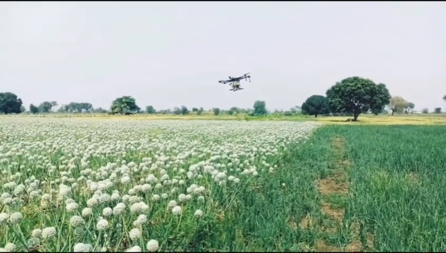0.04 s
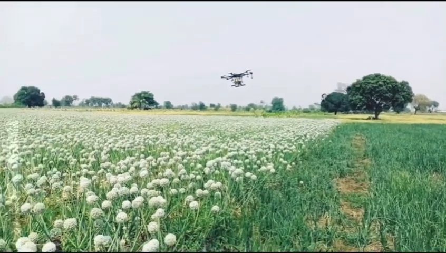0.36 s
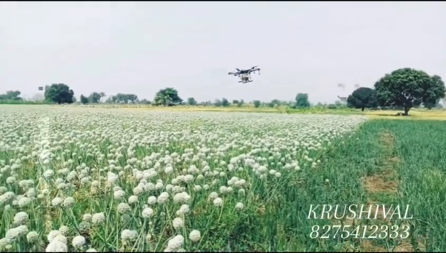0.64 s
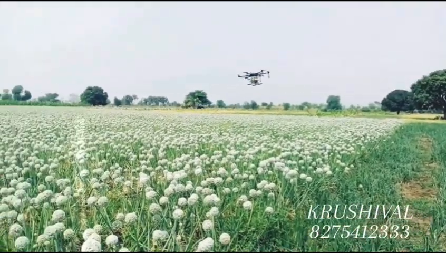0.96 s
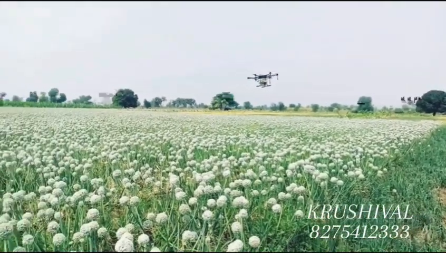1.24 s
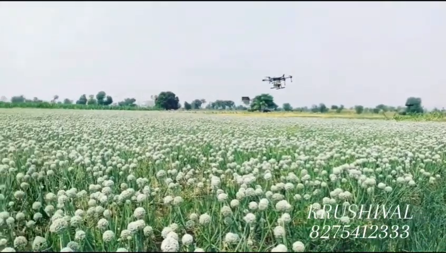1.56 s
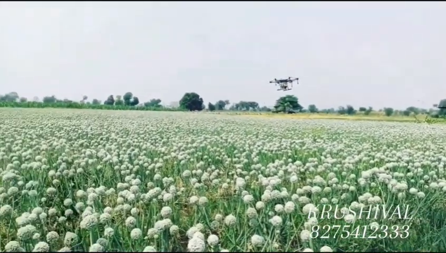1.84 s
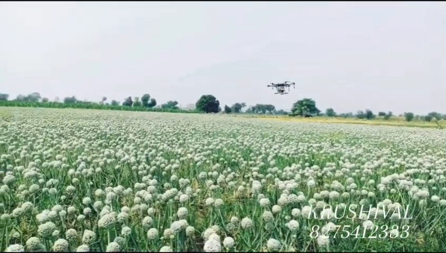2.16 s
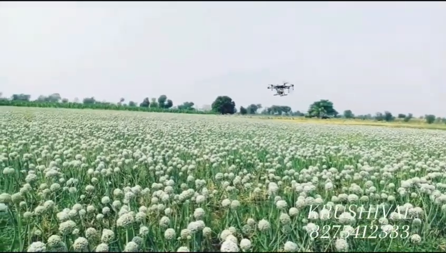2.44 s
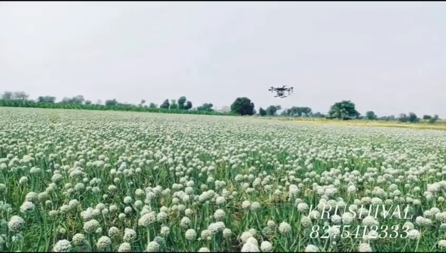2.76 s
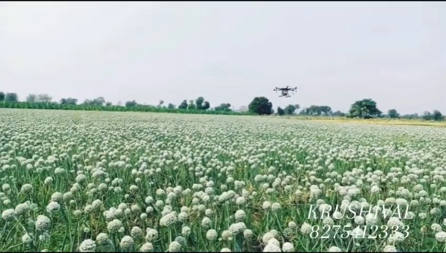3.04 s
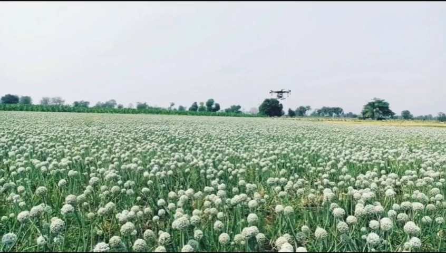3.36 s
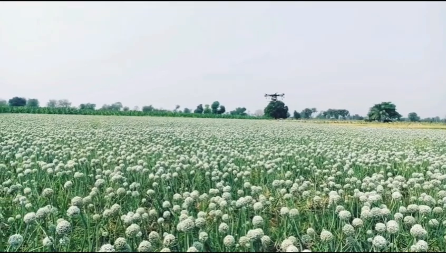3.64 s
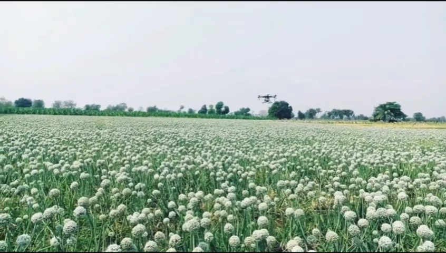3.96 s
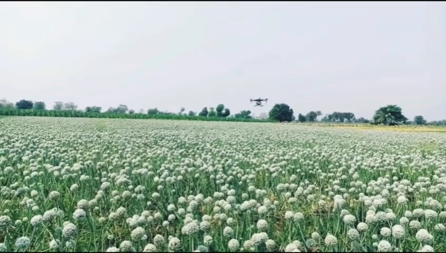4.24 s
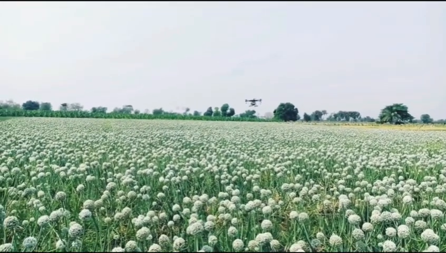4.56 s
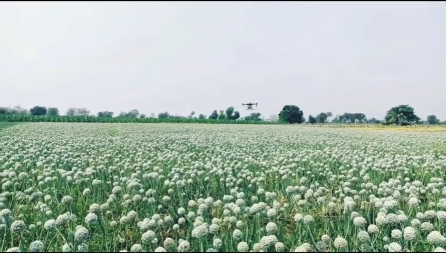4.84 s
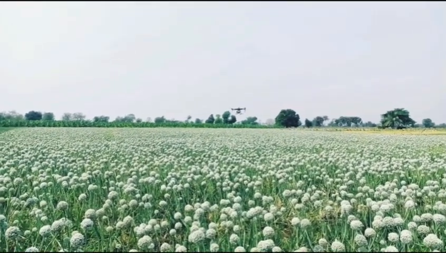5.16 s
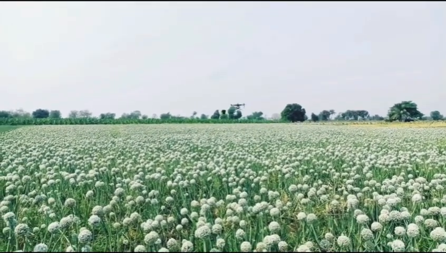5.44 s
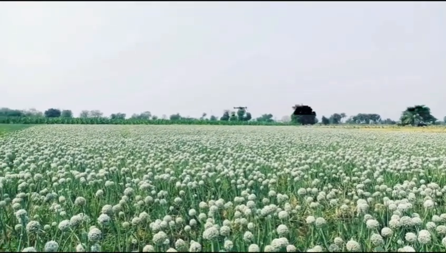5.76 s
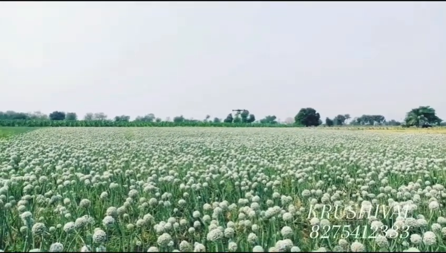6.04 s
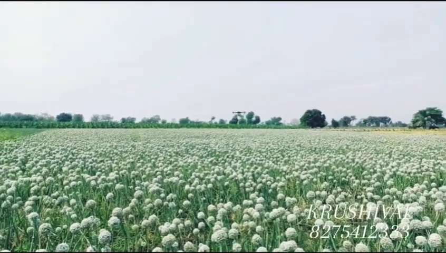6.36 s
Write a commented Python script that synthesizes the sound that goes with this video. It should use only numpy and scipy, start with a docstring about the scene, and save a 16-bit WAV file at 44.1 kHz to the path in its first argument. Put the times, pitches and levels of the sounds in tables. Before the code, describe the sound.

From the first moment a six-rotor drone is heard flying low over an open field, about thirty metres from a stereo microphone. Its rotors run at slightly different speeds, so their low hums beat and waver, topped by a buzz and the rasping chop of blades cutting air. The level holds for about two and a half seconds, with small swells. Around 2.5 seconds a thin, high motor whine comes through and then flickers faintly, while the reflection off the ground makes the rush sound hollow. From about 3 seconds the drone moves away: the upper buzz fades, the pitch sags very slightly and everything grows steadily fainter, though it remains audible to the end at 6.5 seconds. A light breeze rumbles softly on the microphone throughout, with a small puff at half a second and several more between about 5.3 and 6.2 seconds.

```python
"""An open field, a two-port stereo microphone in a light breeze, a six-rotor crop drone low at 30 m.
From the start its hums beat, each rotor at a slightly different speed, and the blades chop and rasp.
Over three seconds it swings onto its course; a thin motor whine comes through, and the echo off the
ground hollows the sound. It then recedes to 65 m, ever fainter, and near the end puffs of air
brush the microphone."""
import sys
import numpy as np
from scipy import signal
from scipy.fft import rfft, irfft, next_fast_len
from scipy.io import wavfile
from scipy.ndimage import uniform_filter1d

SR = 44100
rng = np.random.default_rng(int(sys.argv[2]) if len(sys.argv) > 2 else 0)


def unload_wav(signal):
    """Save mono or channel-first audio to the path in sys.argv[1] as 16-bit WAV at rate SR, clipped to [-1, 1]."""
    wavfile.write(
        sys.argv[1],
        SR,
        np.round(np.clip(np.atleast_2d(signal).T, -1, 1) * 32767).astype(np.int16),
    )


N = 286650
TIME = np.arange(N) / SR

# rotor balance, fastest first: (fundamental [dB], second harmonic [dB], higher harmonics [dB])
ROTOR_BALANCE = [(-0.5, 0.5, -4.5), (-4, -3, -2.5), (-7.5, -3.5, 1.5), (8.5, -9, -5), (6.5, -7.5, -9.5),
                 (1.5, -13, -17)]


def from_db(db):
    return 10 ** (np.asarray(db) / 20)


def rms_one(x):
    return x / np.sqrt(np.mean(x ** 2) + 1e-20)


def in_time(rows, t=TIME):
    """Each column of a curve, joined by straight lines."""
    times, *columns = np.transpose(rows)
    return [np.interp(t, times, c) for c in columns]


def at_hz(rows, hz):
    """Each column of a spectrum, joined on a log-frequency axis."""
    points, *columns = np.transpose(rows)
    return np.array([np.interp(np.log(np.maximum(hz, 1)), np.log(points), c) for c in columns])


def below(hz, edge_hz):
    """Low-pass gain, one half at the edge."""
    return 1 / (1 + (hz / edge_hz) ** 4)


def colour(x, gain_at):
    """Filter by a gain given as a function of frequency."""
    size = next_fast_len(N + SR // 10)
    hz = np.arange(size // 2 + 1) * SR / size
    return irfft(rfft(x, size) * gain_at(hz), size)[..., :N]


def drift(rate_hz):
    """Slow random wander, spread 1."""
    step, settle = 100, 1000
    pole = np.exp(-2 * np.pi * rate_hz * step / SR)
    noise = rng.standard_normal(N // step + settle + 2)
    slow = signal.lfilter([1], [1, -2 * pole, pole * pole], noise)[settle:]
    return np.interp(np.arange(N) / step, np.arange(len(slow)), rms_one(slow))


def patches(shape, frames):
    """A smooth random field over frequency and time, spread 1."""
    field = rng.standard_normal(shape)
    for _ in range(2):
        field = uniform_filter1d(uniform_filter1d(field, size=3, axis=0), size=frames, axis=1)
    return rms_one(field)


def doublings(t=TIME):
    """How many times the distance to the microphone has doubled since the start."""
    # the drone lingers, then gathers speed: (time [s], distance [m])
    flight_path = [(0, 31.3), (1.5, 28.4), (2.5, 28.9), (4, 38.2), (6.5, 65)]
    metres, = in_time(flight_path, t)
    return np.log2(metres / metres[0])


def blade_angles():
    """Steering speeds some rotors up and slows others; each angle runs one cycle per blade pass."""
    # blade-pass rate: (time [s], middle rotor [Hz], fastest above it [Hz], slowest below it [Hz])
    pass_rates = [(0, 116.5, 5.3, 13.87), (.2, 116.4, 4.68, 7.61), (.55, 115.4, 7.49, 6.04),
                  (.9, 113.9, 9.37, 8.53), (1.25, 113.5, 14.14, 11.81), (1.6, 113.3, 8.07, 12.29),
                  (2, 113.3, 9.22, 9.15), (2.4, 114.5, 5.47, 13.29), (2.8, 113.4, 9.45, 10.53),
                  (3.2, 113.2, 8.13, 11.53), (3.6, 113.6, 7.37, 12.14), (4, 113, 8.38, 14.99),
                  (4.4, 112.9, 9.83, 12.88), (4.8, 112.5, 10.23, 11.6), (5.2, 111.3, 6.6, 10.43),
                  (5.6, 109.8, 10.33, 12.02), (6.05, 110.5, 11.98, 13.94), (6.5, 110.2, 9.97, 14.01)]
    # each rotor's part in the steering: (part [1 fastest to -1 slowest])
    steering = [1, .524, .12, 0, -.5345, -1]
    middle, faster, slower = in_time(pass_rates)
    rates = [middle + part * (faster if part > 0 else slower) for part in steering]
    return 2 * np.pi * np.cumsum(rates, axis=1) / SR


def rotor_hum(angles, flutter_db, flutter_hz, wander_rad):
    """Steady load on the blades gives a clean tone; uneven inflow makes its overtones flutter."""
    # blade tones before distance loss: (time [s], fundamental [dB], second [dB], third harmonic [dB])
    blade_tones = [(0, -49, -42.5, -39), (.18, -42.5, -46, -43), (.45, -47.5, -44, -40.5),
                   (.6, -55, -48, -44), (.77, -45, -46.5, -43.5), (1.25, -47.5, -49, -40.5),
                   (1.75, -47.5, -52, -42), (2.25, -46.5, -55, -49), (2.42, -46.5, -47, -50.5),
                   (2.6, -45.5, -56, -43), (2.8, -47.5, -56, -51.5), (3, -47.5, -54, -47.5),
                   (3.6, -48.5, -56, -50), (4.12, -47.5, -55.5, -50.5), (5, -50, -60.5, -51),
                   (6.5, -47.5, -64, -54)]
    # upper buzz: (multiple of the blade-pass rate, starting level [dB])
    buzz = [(4, -55), (5, -48), (6, -49.5), (7, -49.5), (8, -52)]
    first, second, third = from_db(in_time(blade_tones))
    shares = from_db(ROTOR_BALANCE) / np.linalg.norm(from_db(ROTOR_BALANCE), axis=0)
    beam = from_db(-3.5 * TIME)   # overtones beam downward, so they fade as the drone leaves
    out = 0
    for angle, share in zip(angles, shares):
        shaft = from_db(-26.5) * np.sin(angle / 2)   # unbalanced blades, once a turn
        out += first * share[0] * (np.sin(angle) + shaft)
        overtones = [(2, second * share[1]), (3, third * share[2])]
        overtones += [(round(multiple), share[2] * beam * from_db(db)) for multiple, db in buzz]
        for multiple, level in overtones:
            phase = multiple * angle + rng.uniform(0, 2 * np.pi) + wander_rad * drift(flutter_hz)
            out += level * from_db(flutter_db * drift(flutter_hz)) * np.sin(phase)
    return np.sqrt(2) * out


def blade_slaps(angles, jitter_rad, wander_rad, rough, unequal, scatter_rad, scatter_hz):
    """Every blade passing its arm sheds a pulse, never quite on time or equally strong."""
    out = np.zeros(N)
    grid_hz = scatter_hz * np.arange(256)
    for angle, (*_, db) in zip(angles, ROTOR_BALANCE):
        unsteady = angle + jitter_rad * drift(8.7) + wander_rad * drift(1.2)
        passes = np.floor(unsteady / (2 * np.pi) + rng.random())
        hits = np.flatnonzero(np.diff(passes) > 0)
        strength = 1 + rough * rng.standard_normal(N // 100)[:len(hits)]
        pulses = np.zeros(N)
        pulses[hits] = from_db(db / 2) * strength * (1 + unequal * (-1) ** np.arange(len(hits)))
        # the frame scatters each rotor's pulses differently
        twist = scatter_rad * np.cumsum(rng.standard_normal(len(grid_hz)))
        out += colour(pulses - pulses.mean(), lambda hz: np.exp(1j * np.interp(hz, grid_hz, twist)))
    return rms_one(out)


def tip_noise(angles, depth):
    """Tip turbulence swells as each blade swings towards the microphone; its treble is wide."""
    # likeness of the swish at the two ports: (frequency [Hz], likeness [0-1])
    likeness = [(300, 0.8), (520, 0.6), (700, 0.95), (1050, 0.16), (1400, 0.58), (2400, 0.53), (3000, 0.34),
                (5000, 0.05), (9000, 0)]
    swell = np.sqrt(sum(np.exp(depth * np.cos(angle) + 0.21 * drift(10.0)) for angle in angles))
    mid, side = rms_one(swell) * rng.standard_normal((2, N))
    mid = colour(mid, lambda hz: np.sqrt((1 + at_hz(likeness, hz)[0]) / 2))
    side = colour(side, lambda hz: np.sqrt((1 - at_hz(likeness, hz)[0]) / 2))
    return np.array([mid + side, mid - side])


def cut_air(angles, wash_hz, tonal_hz, buzz_share, smear_s):
    """Blade pulses rule the mids; they give way to downwash below and to tip noise higher up."""
    share = lambda hz: buzz_share * below(hz, tonal_hz) * (1 - below(hz, wash_hz))
    # a blade crosses its arm from root to tip, which smears each pulse in time
    smear = lambda hz: np.exp(-2j * np.pi * smear_s * tonal_hz * np.log1p(hz / tonal_hz))
    pulses = blade_slaps(angles, jitter_rad=.035, wander_rad=.35, rough=0.33, unequal=0.036,
                         scatter_rad=0.8, scatter_hz=129.9)
    slaps = colour(pulses, lambda hz: np.sqrt(share(hz)) * smear(hz))
    noise = colour(tip_noise(angles, depth=0.74), lambda hz: np.sqrt(1 - share(hz)))
    return slaps + noise


def turbulence_db(hz, t, turn_s=2.9, steady_hz=12300):
    """The rush of air swells and eases, changes colour as the drone turns and dulls with distance."""
    # blade turbulence:
    # (frequency [Hz], before the turn [dB], after it [dB], extra loss [dB per doubling of distance])
    turbulence = [(290, -20.5, -23, -1), (438, -27, -23, 1.5), (507, -28, -23.5, .5), (680, -30, -22, 0),
                  (1080, -29, -23.5, 1.5), (1290, -20, -26.5, -0.5), (1450, -19.5, -28, -3),
                  (2400, -40.5, -34, 2), (3000, -32, -30, 3), (4080, -25.5, -26.5, 2.5)]
    # swings of the rush, shallower in the treble: (time [s], level [dB])
    rush = [(0, -1), (.4, 1.1), (.65, -0.9), (1.33, 1), (1.7, 0.5), (1.85, -1.5), (2, 2), (2.18, 0),
            (2.4, 1.6), (2.65, 0.5), (2.95, 2), (3.7, -0.5), (3.98, 2.1), (4.57, -1.5), (5.2, 1.5),
            (5.92, -0.5), (6.3, 1.5), (6.5, 0)]
    turned = np.clip(t / turn_s, 0, 1)
    before, after, loss = at_hz(turbulence, hz)
    swell = in_time(rush, t)[0] / (1 + hz / steady_hz)
    return before + (after - before) * turned - loss * doublings(t) + swell


def swells_db(hz, t):
    """Brief swells, each in one region of the spectrum; the last is a narrow motor hiss near 6 kHz."""
    # swells: (time [s], half-length [s], centre [Hz], half-width [octaves], lift [dB])
    swells = [(0.404, 0.032, 1450, 0.56, 4), (1.047, 0.05, 7000, 1.6, 2), (1.97, 0.097, 540, 0.34, 8),
              (2.362, .041, 2610, 0.24, 12), (2.392, 0.038, 490, 0.53, 7), (2.55, .014, 2400, 0.078, 17),
              (2.987, 0.042, 2450, 0.47, 5), (3.02, .05, 406, 0.27, 8.5), (3.356, 0.037, 2560, 0.16, 10),
              (4.963, 0.014, 1400, 0.36, 3.5), (5.168, 0.04, 517, 0.42, 6), (5.213, 0.045, 1900, .6, 2.5),
              (5.39, 0.054, 1380, 0.22, 5.5), (6.21, 0.045, 1930, 0.12, 9.5), (6.377, 0.21, 6100, 0.057, 9)]
    return sum(db * np.exp(-((t - s) / length) ** 2 - (np.log2((hz + 1) / centre) / width) ** 2)
               for s, length, centre, width, db in swells)


def over_field(x, twinkle_db, twinkle_hz):
    """Viewing angle, moving air and a faint reflection colour the rush on its way to the microphone."""
    # reflection near the microphone, shifting with bearing: (time [s], dip spacing [Hz], strength [0-1])
    near_reflection = [(0, 577, 0.43), (.5, 568, 0.26), (1.4, 556, 0.19), (2.6, 509, 0.23), (3.8, 526, .28),
                       (5, 543, 0.26), (6.5, 556, 0.19)]
    # spectrum of the cut air: (frequency [Hz], from below [dB], edge-on from afar [dB])
    swish = [(50, -23.5, -23), (175, -19, -21.5), (285, -9.5, -22.5), (370, -10.5, -17), (425, -2, -8.5),
             (570, 1, 5), (740, -4, 4.5), (814, -15.5, 7.5), (910, -2.5, -6.5), (1000, 4, -2.5),
             (1145, -3.5, -4), (1450, -11, 1), (1570, -7.5, -2.5), (1920, -0.5, -6.5), (2403, 5, 3),
             (2786, -3, 0), (3930, -9.5, -13), (5120, -16.5, -22), (5640, -19.5, -15.5), (5840, -22, -15),
             (6180, -17.5, -9.5), (6850, -20.5, -10), (7400, -18.5, -18.5), (15500, -20, -26.5)]
    # the rotors as seen from the microphone: (time [s], edge-on [0-1])
    edge_on = [(0, 0.43), (2.5, 0.35), (3.8, 0.5), (4.8, 0.87), (6.5, 0.83)]
    framing = dict(nperseg=1024, noverlap=768)
    hz, t, frames = signal.stft(x, SR, **framing)
    hz = hz[:, None]
    spacing_hz, ripple = in_time(near_reflection, t)
    reflection = 1 - ripple * np.exp(-2j * np.pi * hz / spacing_hz) / (1 + (hz / twinkle_hz) ** 2)
    near_db, far_db = at_hz(swish, hz)
    view_db = near_db + (far_db - near_db) * in_time(edge_on, t)[0]
    # moving air makes single partials swell and fade, mostly above the chop
    twinkle = twinkle_db * patches(view_db.shape, frames=5) * hz / (hz + 300) / (1 + hz / twinkle_hz)
    gain = from_db(view_db + turbulence_db(hz, t) + swells_db(hz, t) + twinkle)
    return signal.istft(frames * reflection * gain, SR, **framing)[1][:, :N]


def ground_echo(x, scatter_hz):
    """The bounce off the field comes half a period late for one pitch and thins its odd multiples."""
    # ground bounce: (time [s], first notch [Hz], strength [0-1])
    bounce = [(0, 1110, .6), (.9, 1100, .45), (1.4, 980, .25), (2, 835, .55), (2.6, 850, .85),
              (3.3, 875, .9), (4.6, 915, .88), (6.5, 985, .86)]
    notch_hz, strength = in_time(bounce)
    dull = colour(x, lambda hz: below(hz, scatter_hz))   # the crop scatters the treble
    echo = np.array([np.interp(TIME - .5 / notch_hz, TIME, side) for side in dull])
    return x - dull + (dull + strength * echo) / np.sqrt(1 + strength ** 2)


def breeze(level_db, swing_db, swing_hz, puff_s):
    """Light air rumbles on the microphone, partly shared by both ports, with a few stronger puffs."""
    # wind rumble: (frequency [Hz], relative density [dB])
    rumble = [(12, -4), (30, -1), (50, 14), (90, -1), (200, -7), (600, -60), (2000, -100)]
    # puffs on the microphone: (time [s], level [dB])
    puffs = [(.52, -64), (5.34, -61), (5.7, -63), (6.03, -58), (6.23, -67)]
    noise = rng.standard_normal(N) + rng.standard_normal((2, N))
    level = from_db(level_db + swing_db * drift(swing_hz))
    level += sum(from_db(db) * np.exp(-((TIME - s) / puff_s) ** 2) for s, db in puffs)
    return level * rms_one(colour(noise, lambda hz: from_db(at_hz(rumble, hz))))


def motor_whine(angles, multiple, blur_rad, waver_db):
    """Magnets passing the coils sing at a multiple of the blade-pass rate, blurred by torque ripple."""
    # whine reaching the microphone: (time [s], level [dB])
    whine_level = [(0, -81), (2, -70), (2.45, -56), (2.75, -66), (3.15, -60), (3.5, -66), (3.8, -62),
                   (4.05, -64), (4.2, -60), (4.55, -59.5), (4.7, -69), (4.88, -64), (5.1, -68), (5.6, -68),
                   (6.1, -65), (6.5, -65)]
    # each motor's share, fastest first: (relative level [dB])
    motor_shares = [12, -13, -19, -8, -19, -18]
    out = 0
    for angle, motor_db in zip(angles, motor_shares):
        blur = blur_rad * drift(17.0) + rng.uniform(0, 2 * np.pi, (2, 1))
        out += from_db(motor_db + waver_db * drift(16.0)) * np.sin(multiple * angle + blur)
    return from_db(in_time(whine_level)[0]) * rms_one(out)


def microphone_ports(hz, left_lag_s=7e-5, lag_fade_hz=1640):
    """Each port has its own colour, and long waves reach the left one a little later."""
    # port response: (frequency [Hz], left [dB], right [dB])
    port_response = [(387, -0.5, -0.5), (840, -1.6, 0), (1060, -2.2, -0.2), (1540, -6, 4), (2260, -6, 3),
                     (3280, -7, -4.5), (5130, -1, 3), (6520, -11, 4), (6800, -13, 5.5), (7580, -3, 1.5),
                     (9620, 6, -7.5), (10430, 1.5, -24), (11640, -1.5, 0.5), (12300, 4.5, 3.5),
                     (14200, -6.5, -1), (15200, -10, 4)]
    lag_s = left_lag_s * below(hz, lag_fade_hz) * np.array([[1], [0]])
    return from_db(at_hz(port_response, hz)) * np.exp(-2j * np.pi * hz * lag_s)


def scene():
    """Six blade angles drive the whole drone; hum and rush halve as the distance doubles."""
    angles = blade_angles()
    chop = cut_air(angles, wash_hz=268, tonal_hz=1751, buzz_share=0.75, smear_s=.011)
    rush = over_field(chop, twinkle_db=3.0, twinkle_hz=7440)
    hum = rotor_hum(angles, flutter_db=2.17, flutter_hz=4.1, wander_rad=0.18)
    rotors = ground_echo((hum + rush) / 2 ** doublings(), scatter_hz=2450)
    whine = motor_whine(angles, multiple=56, blur_rad=0.7, waver_db=4.0)
    wind = breeze(level_db=-66, swing_db=2, swing_hz=5.8, puff_s=0.058)
    return colour(rotors + whine, microphone_ports) + wind


def record(dry):
    """The top is cut steeply."""
    cutoff_hz, slope_hz = 15560, 150
    return colour(dry, lambda hz: np.clip((cutoff_hz - hz) / slope_hz, 0, 1))


dry = scene()
out = record(dry)
unload_wav(out)
```